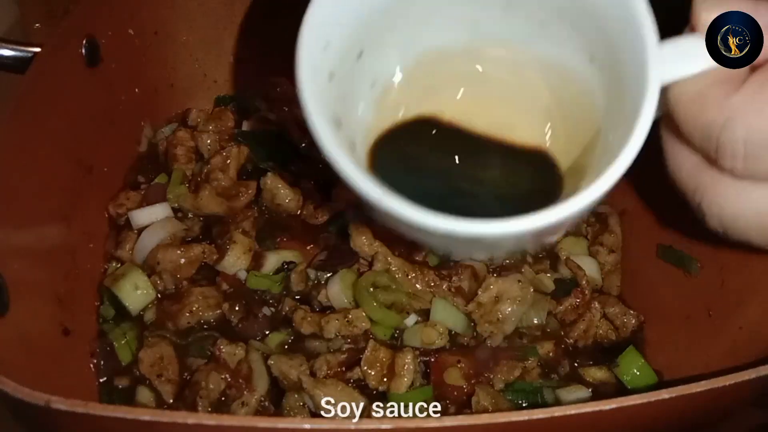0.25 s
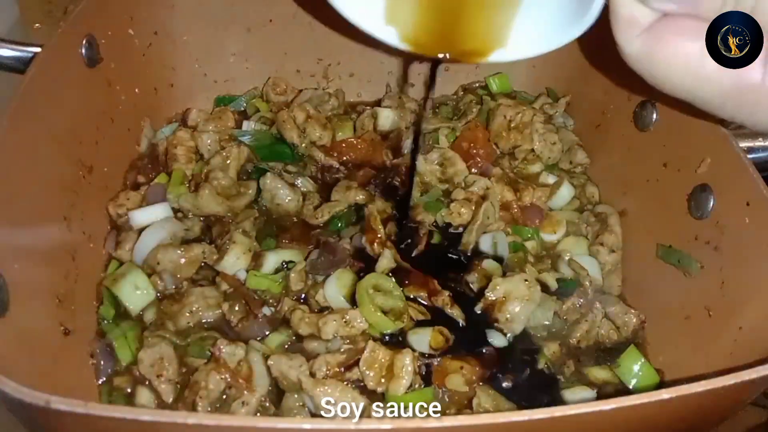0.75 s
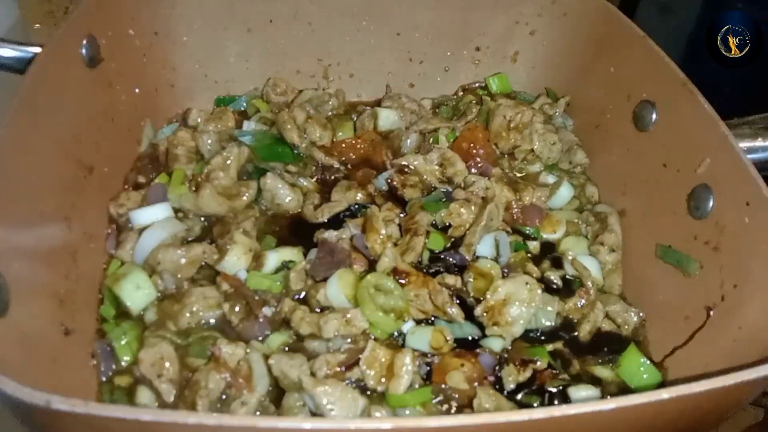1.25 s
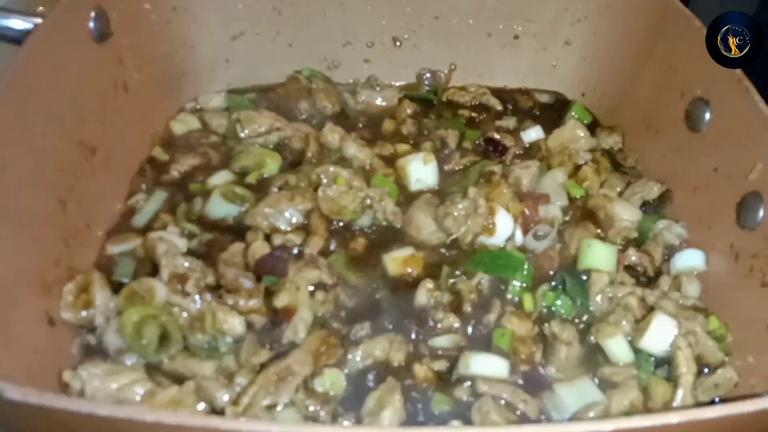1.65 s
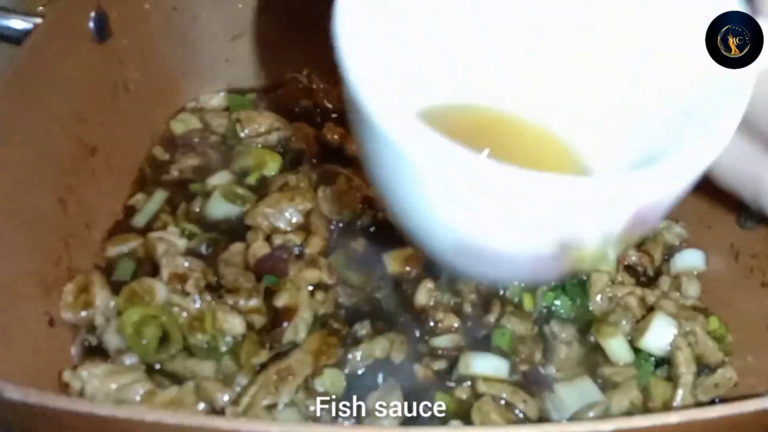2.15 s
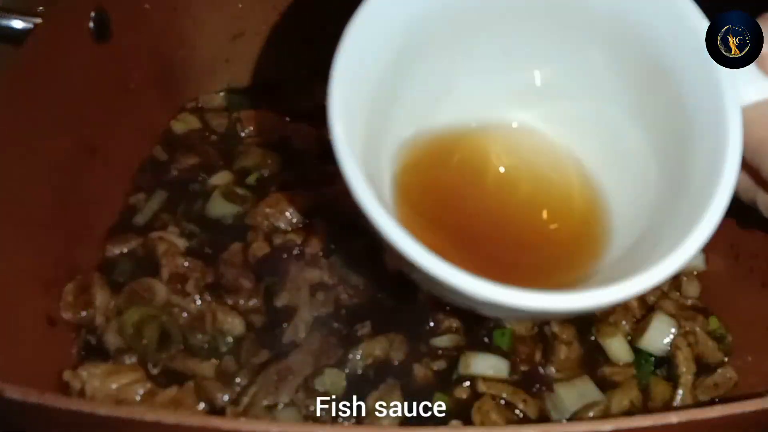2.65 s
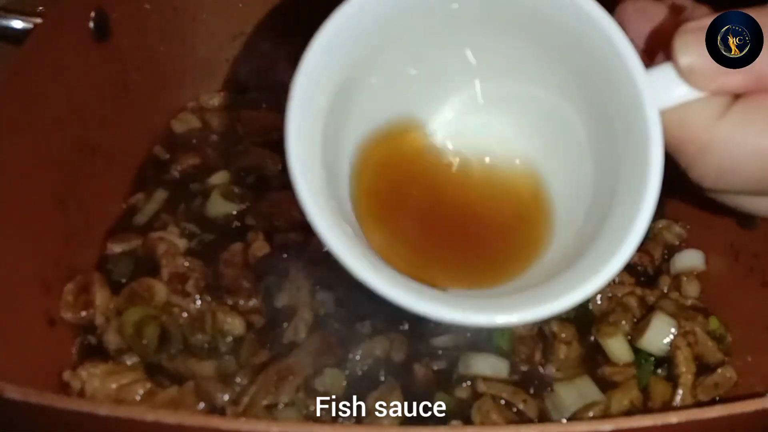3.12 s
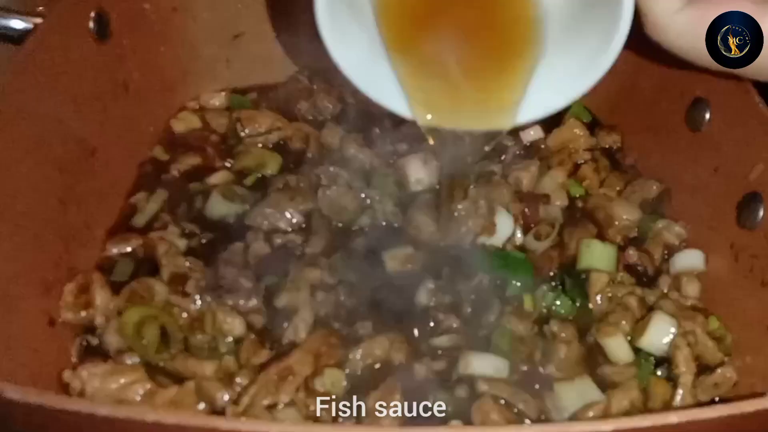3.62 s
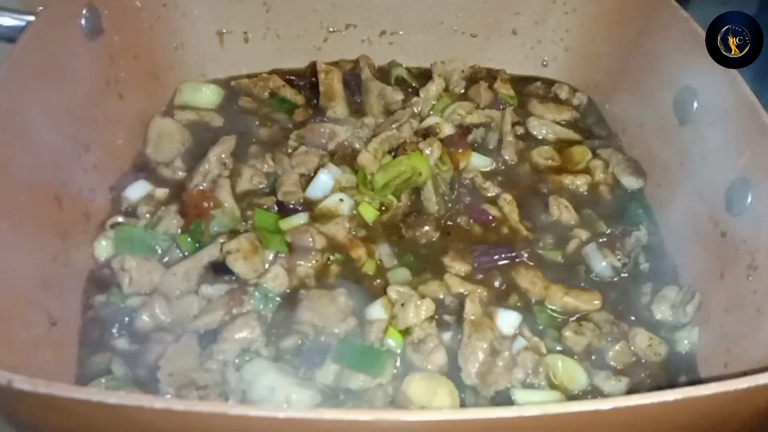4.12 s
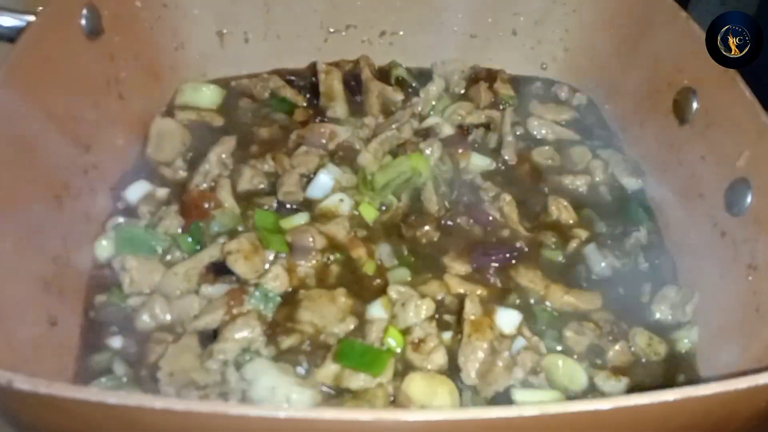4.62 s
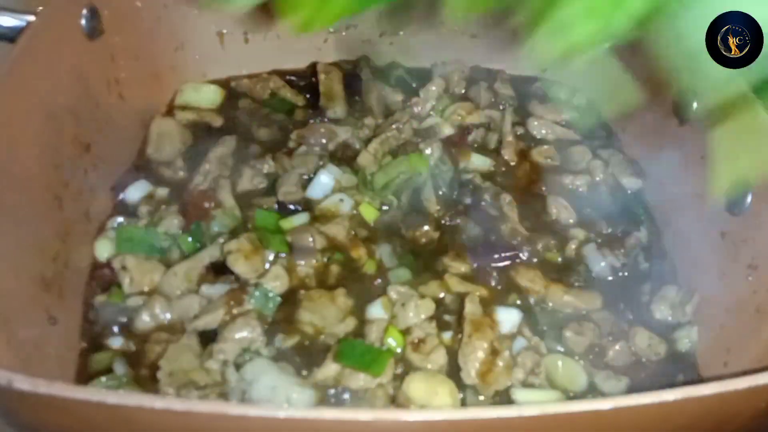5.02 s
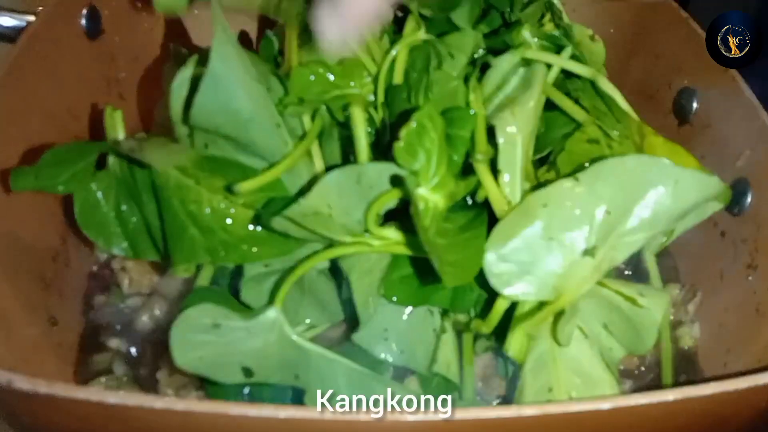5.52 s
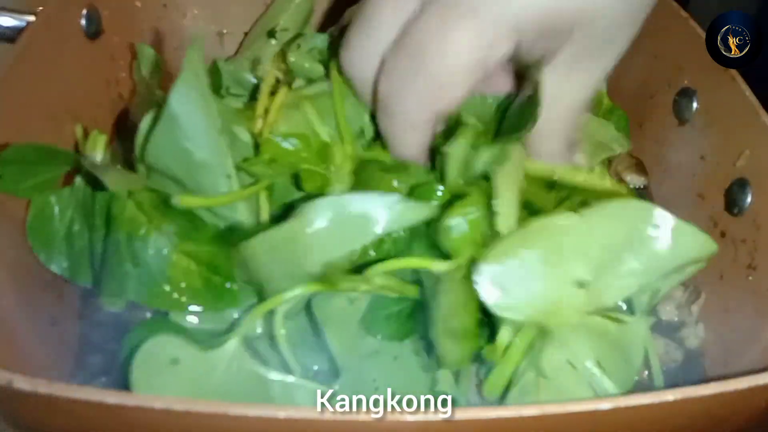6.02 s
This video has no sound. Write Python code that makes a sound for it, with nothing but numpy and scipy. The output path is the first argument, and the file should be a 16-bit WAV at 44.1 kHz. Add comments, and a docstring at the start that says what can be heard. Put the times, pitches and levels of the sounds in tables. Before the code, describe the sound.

A bright, grainy sizzle runs throughout over low bubbling sauce, a thin metallic singing from the pan and faint room rumble. Early on, a pour gurgles amid gritty steam bursts; a second one is short and faint. After a tiny dropout and a low thud, wet leaves flare the hiss and crunch softly as they are pressed down. Close, dry, mono kitchen sound.

```python
"""Meat and sauce fry in a wide pan, close to a mono microphone, over a low room rumble.
From the start, random swarms of tiny damped pings make the sizzle, and coloured noise thickens it.
The pan sings, the sauce simmers and spits, steam spurts, and poured sauce gurgles: first long, later briefly.
After about four seconds the sound drops out for an instant; later one dull knock sounds, a sagging sine.
Then a handful of wet greens lands with a brighter hiss, and rustles in short scrapes of grainy clicks."""
import sys
import numpy as np
from scipy import signal
from scipy.fft import rfft, irfft, next_fast_len
from scipy.io import wavfile
from scipy.ndimage import map_coordinates

SR = 44100
rng = np.random.default_rng(int(sys.argv[2]) if len(sys.argv) > 2 else 0)


def pcm_store(signal):
    """Save signal as 16-bit PCM."""
    levels = np.round(np.clip(np.atleast_2d(signal), -1, 1) * 32767)
    wavfile.write(sys.argv[1], SR, levels.astype(np.int16).T)


N = 276198
TIME = np.arange(N) / SR  # seconds
TOP_HZ = 15560  # nothing sounds above this


def amp(db):
    """Turn decibels into a gain."""
    return 10 ** (np.asarray(db) / 20)


def unit(x):
    """Scale x to an average (rms) strength of 1."""
    return x / np.sqrt(np.mean(x ** 2) + 1e-20)


def curves(rows):
    """Draw straight lines between table rows: one curve for each column after the time."""
    seconds, *columns = np.transpose(rows)
    return [np.interp(TIME, seconds, column) for column in columns]


def wobble(rate):
    """Make a smooth random curve through `rate` random points a second."""
    knots = rng.standard_normal(int(N * rate / SR) + 4)
    return map_coordinates(knots, [TIME * rate])


def filtered(x, response):
    """Multiply the spectrum of x by a response that depends on frequency."""
    padded = next_fast_len(N + SR // 2)
    spectrum = rfft(x, padded)
    return irfft(spectrum * response(np.fft.rfftfreq(padded, 1 / SR)), padded)[:N]


def coloured(x, points):
    """Shape the tone of x by (frequency [Hz], relative level [dB]) points, at rms 1."""
    f, db = np.transpose(points)
    return unit(filtered(x, lambda hz: amp(np.interp(np.log(hz + 1), np.log(f), db))))


def resonance(hz, centre_hz, width):
    """Response of one damped mode: a body that rings near centre_hz, `width` Hz wide."""
    return 1j * hz * width / (centre_hz ** 2 - hz ** 2 + 1j * hz * width)


def patchy(x, depth_db, width_hz, life):
    """Give x random swells, each about width_hz wide and `life` seconds long, at rms 1."""
    hz, t, z = signal.stft(x, SR, nperseg=512)
    knots = rng.standard_normal((400, 800))
    places = np.meshgrid(hz / width_hz, t / life, indexing="ij")
    field = map_coordinates(knots, places, mode="wrap")
    return unit(signal.istft(z * amp(depth_db * field), SR, nperseg=512)[1][:N])


def bubbles(rate, pitch_hz, spread, cycles, scatter_db, size):
    """A swarm of `rate` damped sines a second, random in time, pitch and strength, at rms 1."""
    count = int(rate * N / SR)
    start = rng.integers(0, N, count)[:, None]
    hz = np.clip(pitch_hz * np.exp(spread * rng.standard_normal((count, 1))), 50, TOP_HZ)
    strength = amp(scatter_db * np.minimum(rng.exponential(size=(count, 1)), 4))
    sign = rng.choice([-1, 1], (count, 1))
    turns = hz * np.arange(size) / SR
    ring = strength * sign * np.sin(2 * np.pi * turns) * np.exp(-turns / cycles)
    places = start + np.arange(size)
    return unit(np.bincount(places.ravel(), ring.ravel(), N + size)[:N])


def add(track, s, sound):
    """Mix a short sound into the track at time s."""
    start = max(round(s * SR), 0)
    track[start:start + len(sound)] += sound[:max(N - start, 0)]


def envelope(s, hold, attack, fade_db_per_s):
    """Rise from time s over `attack` seconds; fade once `hold` seconds have passed since s."""
    rise = np.clip((TIME - s) / attack, 0, 1)
    return rise * amp(-fade_db_per_s * np.maximum(TIME - s - hold, 0))


def bell(s, half):
    """A brief bell-shaped swell that peaks at time s."""
    return np.exp(-((TIME - s) / half) ** 2 / 2)


# Tone of the room rumble: (frequency [Hz], relative level [dB])
ROOM_TONE = [(20, -39), (50, -12.5), (110, -1.5), (180, 0.5), (270, -7), (330, -5), (410, -11.5),
             (900, -5.5), (4000, -35.5)]


def kitchen(level_db=-67):
    """A low, slightly uneven room rumble made of coloured noise."""
    rumble = coloured(rng.standard_normal(N), ROOM_TONE)
    rumble = patchy(rumble, depth_db=3.5, width_hz=106, life=0.052)
    return amp(level_db + 1.17 * wobble(14)) * rumble


# How hard the pan fries, before each layer's own trim; patchy_hiss and simmer read it too:
# (time [s], sizzle level [dB], patchy hiss level [dB], fine spray level [dB])
FRYING_LEVELS = [(0.0, -51, -51.5, -56), (0.1, -53.5, -57.5, -67), (0.45, -50, -55.5, -60.5),
                 (0.89, -50.5, -51.5, -58.5), (1.04, -50.5, -48.5, -51), (1.2, -49.5, -51, -58),
                 (1.5, -51, -56, -59.5), (2.05, -49.5, -53, -57.5), (2.15, -52, -56, -63),
                 (2.45, -51, -54.5, -60.5), (3.95, -51, -54, -59), (4.25, -54, -60.5, -69.5),
                 (4.58, -50.5, -57, -64), (4.87, -55, -62, -68.5), (6.26, -52, -64, -60)]
# Tone of the bursting bubbles: (frequency [Hz], relative level [dB])
SIZZLE_TONE = [(1500, -37), (2300, -27.5), (3100, -18.5), (4200, -25), (5300, -14.5), (6150, -12),
               (6450, 0), (7000, -1), (7350, -2.5), (7750, -2.5), (9000, -11), (10500, -10.5), (11200, -33),
               (16000, -40)]
# Tone of the fine spray: (frequency [Hz], relative level [dB])
SPRAY_TONE = [(4000, -51), (6000, -9), (7800, -2.5), (9000, -4.5), (10400, -3.5), (11300, -2.5), (12500, 0),
              (13050, 4), (13700, 0), (14600, 2), (15600, 4)]


def sizzle():
    """Tiny steam bubbles burst in clumps; their spray adds a finer hiss above. Wet greens feed both."""
    sizzle_db, _, spray_db = curves(FRYING_LEVELS)
    clumps = wobble(45) + 0.088 * wobble(17)

    bursts = bubbles(rate=1300, pitch_hz=6890, spread=0.32, cycles=4.1, scatter_db=3.5, size=200)
    crackle = coloured(bursts + amp(3.5) * rng.standard_normal(N), SIZZLE_TONE)
    crackle_gain = np.hypot(amp(sizzle_db), amp(-0.5) * steam(haste=1.8)) * amp(1.5 * clumps)

    droplets = bubbles(rate=2500, pitch_hz=10860, spread=0.34, cycles=2.2, scatter_db=3.0, size=64)
    spray = coloured(droplets + rng.standard_normal(N), SPRAY_TONE)
    spray = patchy(spray, depth_db=2.1, width_hz=618, life=0.042)
    pan_spray = amp(spray_db + 5.4 + 1.8 * clumps + 1.3 * wobble(13))
    greens_spray = amp(4.5 + 0.3 * clumps) * steam()
    return crackle_gain * crackle + np.hypot(pan_spray, greens_spray) * spray


# Tone of the patchy hiss: (frequency [Hz], relative level [dB])
PATCHY_HISS_TONE = [(1900, -37), (2500, -16), (2800, -13.5), (3050, -18), (3300, -11), (3800, -12.5),
                    (4100, -29.5), (4550, -16), (4950, -9.5), (5300, -1.5), (5750, 1), (6050, -4),
                    (6350, -7), (7500, -35)]


def patchy_hiss():
    """A hiss, mostly at 5 to 6 kHz, in narrow random patches that come and go; it swells with the greens."""
    pings = bubbles(rate=1500, pitch_hz=5300, spread=0.251, cycles=5.1, scatter_db=2, size=200)
    hiss = coloured(pings + amp(5.5) * rng.standard_normal(N), PATCHY_HISS_TONE)
    hiss = patchy(hiss, depth_db=5.5, width_hz=190, life=.028)
    steady_gain = amp(curves(FRYING_LEVELS)[1] + 2.5)
    return np.hypot(steady_gain, amp(-5.5) * steam(haste=1.9)) * hiss


# The pan's narrow mode sings throughout: (time [s], level [dB])
SINGING_LEVELS = [(0.0, -61), (0.9, -56.5), (1.8, -55), (2.5, -62), (3.2, -61.5), (3.85, -53),
                  (4.03, -59.5), (5.0, -60.5), (5.3, -52.5), (6.26, -53.5)]
# It also flares up at times: (time of the peak [s], level [dB])
SINGING_FLARES = [(0.265, -49.5), (0.405, -48.5), (0.608, -49), (0.89, -48.5), (1.68, -48.5), (2.29, -48),
                  (2.78, -53.5), (4.835, -53.5)]
FLARE_HALF_S = 0.016


def pan_ring():
    """Bursts on the metal keep one narrow mode singing; it swells and wavers a little in pitch."""
    taps = bubbles(rate=1200, pitch_hz=3547, spread=0.14, cycles=2.8, scatter_db=2.5, size=160)
    narrow_ring = filtered(taps, lambda hz: resonance(hz, centre_hz=3584, width=41)
                           * resonance(hz, centre_hz=3160, width=790))
    waver = np.exp(2j * np.pi * np.cumsum(30 * wobble(24)) / SR)  # shifts the pitch by some 30 Hz
    singing = (signal.hilbert(narrow_ring) * waver).real * amp(1.8 * wobble(26))
    flares = sum(amp(db) * bell(s, FLARE_HALF_S) for s, db in SINGING_FLARES)
    return np.hypot(amp(curves(SINGING_LEVELS)[0]), flares) * unit(singing)


# Tone of the simmering sauce: (frequency [Hz], relative level [dB])
SIMMER_TONE = [(250, -36), (430, -15), (540, -2), (640, -11), (740, -5), (830, -13), (950, -4.5),
               (1120, -3.5), (1300, 1), (1520, 2.5), (1800, -5.5), (2300, -7.5), (4000, -18)]


def simmer(below_sizzle_db=-8.0):
    """Slower, lower bubbles in the thick sauce; their level follows the sizzle a little."""
    swarm = bubbles(rate=1100, pitch_hz=1195.6, spread=0.3613, cycles=13.8, scatter_db=2.5, size=1400)
    body = coloured(swarm + amp(5) * rng.standard_normal(N), SIMMER_TONE)
    body = patchy(body, depth_db=1.98, width_hz=202, life=.05)
    sizzle_db = curves(FRYING_LEVELS)[0]
    average_db = sizzle_db.mean()
    return amp(average_db + below_sizzle_db + 0.28 * (sizzle_db - average_db)) * body


# Blubs in the sauce, and one short high chirp near the pan's singing pitch:
# (time [s], level before the soft swell [dB], starting pitch [Hz])
BLUBS_AND_CHIRP = [(0.235, -45, 1260), (0.378, -37.5, 1390), (0.545, -45, 1100), (0.618, -48.5, 243),
                   (0.750, -41, 1250), (1.036, -40.5, 734), (1.149, -39, 1567), (1.313, -37.5, 1440),
                   (1.325, -53, 380), (1.343, -52, 121), (1.583, -43, 1740), (1.606, -41.5, 947),
                   (1.67, -44, 702), (2.491, -45, 1210), (2.722, -47.5, 1252), (3.745, -46.5, 743),
                   (4.415, -30, 3710), (5.545, -44, 521), (6.02, -49.5, 343)]
# Ring time (to -60 dB) of the lowest blubs, random spread of the pitch, pitch above which they die fast
BLUB_T60_S, BLUB_WIDTH_HZ, BLUB_SMALL_HZ = 0.14, 20, 2590


def blubs_and_chirp():
    """Blubs swell softly and rise in pitch, as does one high chirp; the higher the pitch, the sooner it dies."""
    out, t = np.zeros(N), np.arange(SR // 5) / SR
    for s, db, hz in BLUBS_AND_CHIRP:
        t60 = BLUB_T60_S / (1 + (hz / BLUB_SMALL_HZ) ** 2)
        swell = (1 - np.exp(-t / .006)) * amp(db - 60 * t / t60)
        quiver = np.cumsum(rng.standard_normal(len(t))) * np.sqrt(2 * np.pi * BLUB_WIDTH_HZ / SR)
        rising_phase = 2 * np.pi * hz * t * (1 + 0.043 * t / t60)
        add(out, s, swell * np.sin(rising_phase + quiver))
    return out


# Liquid flashing to steam on hot metal:
# (time of the peak [s], level [dB], half length [s], lowest pitch [Hz])
STEAM_SPURTS = [(0.385, -37.5, 0.0088, 3600), (0.788, -45, 0.014, 2490), (1.057, -43.5, 0.0098, 3200),
                (1.085, -43.5, 0.0071, 4200), (1.151, -35, 0.0078, 1750), (2.914, -52.5, 0.0077, 2730),
                (3.383, -42, 0.0023, 6100), (3.857, -54.5, 0.028, 1800), (4.6, -56, 0.015, 10000),
                (4.716, -48, 0.016, 9000), (5.403, -42, 0.034, 4300), (5.491, -36, 0.0014, 6500),
                (5.9112, -35.5, .0011, 6550), (5.916, -38, 0.00078, 6200), (5.998, -44, 0.036, 5150)]
# Tone of the steam puffs: (frequency [Hz], relative level [dB])
PUFF_TONE = [(1500, 3), (2600, -1), (3500, 1), (4250, -4.5), (5400, 3), (7000, -0.5), (15000, 1)]


def spurts(tilt=0.4):
    """Short, gritty puffs of steam, each with its own low edge and a gentle loss of treble above it."""
    out = np.zeros(N)
    grit = bubbles(rate=3500, pitch_hz=4900, spread=.42, cycles=3, scatter_db=2.6, size=200)
    grit = patchy(coloured(grit, PUFF_TONE), depth_db=2.5, width_hz=230, life=.03)
    grit = grit * amp(1.4 * wobble(260))
    for s, db, half, low_hz in STEAM_SPURTS:
        shape = bell(s, half)
        puff = shape * filtered(
            grit, lambda hz: (1 - 1 / (1 + (hz / low_hz) ** 6)) / (1 + hz / low_hz) ** tilt)
        # even out the strength, so that the table alone sets the level
        out += amp(db) * puff * np.linalg.norm(shape) / np.linalg.norm(puff)
    return out


# The loudest snapping bubbles: (time [s], peak level before a 5 dB cut [dB], pitch [Hz])
SNAPPING_BUBBLES = [(0.5453, -27, 5740), (0.771, -23, 7380), (1.0854, -29, 5430), (1.3197, -25, 5230),
                    (1.909, -25, 5790), (2.352, -27, 5350), (3.3812, -24, 6000), (4.0077, -30, 5950),
                    (4.079, -27, 7100), (4.1807, -32, 6960), (4.2514, -25.5, 6720), (4.399, -26, 14400),
                    (4.455, -21, 6700), (4.653, -30.5, 7680), (4.952, -28.5, 7300), (5.4005, -20.5, 6170),
                    (5.965, -26, 6100), (5.973, -24, 5970)]


def pops():
    """A snapping bubble: a brief sine ping with a crack of fine spray made of bright noise."""
    out, t = np.zeros(N), np.arange(SR // 60) / SR
    for s, db, hz in SNAPPING_BUBBLES:
        ping = np.sin(2 * np.pi * hz * t) * amp(-60 * t / 0.0076)
        crack = 0.13 * np.diff(rng.standard_normal(len(t) + 1)) * amp(-60 * t / 0.013)
        snap = (ping + crack) * (1 - np.exp(-t / 0.0002))
        add(out, s, amp(db - 5.0) * snap / np.abs(snap).max())
    return out


# Sauce poured from a cup: (time [s], length [s], level [dB])
SAUCE_POURS = [(0.68, 1.05, -58.5), (3.72, 0.2, -64)]
POUR_ATTACK_S, POUR_FADE_DB_PER_S = 0.1, 50


def trickle(centre_hz=1450, width=260, spatter_db=-7.5):
    """Poured sauce gurgles in bubbles of nearly one size, and spatters in drops of all sizes."""
    swarm = bubbles(rate=500, pitch_hz=1470, spread=.1, cycles=8, scatter_db=2.5, size=1000)
    gurgle = unit(filtered(swarm, lambda hz: resonance(hz, centre_hz, width)))
    drops = bubbles(rate=220, pitch_hz=1800, spread=.55, cycles=12, scatter_db=2.5, size=1400)
    stream = sum(amp(db) * envelope(s, length, POUR_ATTACK_S, POUR_FADE_DB_PER_S)
                 for s, length, db in SAUCE_POURS)
    return stream * (gurgle + amp(spatter_db) * drops)


def knock(s=4.7262, thud_db=-15, start_hz=270, rest_hz=110, tick_hz=1870, tick_db=-28,
          crack_db=-32, boom_db=-42, body_hz=395, body_db=-42):
    """A damped thud whose pitch sags, with a hard tick in its first milliseconds, a hollow ring and a room boom."""
    out, t = np.zeros(N), np.arange(SR // 4) / SR
    hz = rest_hz + (start_hz - rest_hz) * np.exp(-t / 0.0028)
    thud_shape = (1 - np.exp(-t / 0.0015)) * np.exp(-(t / 0.013) ** 2)
    thud = np.sin(2 * np.pi * np.cumsum(hz) / SR) * thud_shape
    thud = signal.sosfilt(signal.butter(3, 750, fs=SR, output="sos"), thud)

    contact = np.exp(-((t - .0021) / .0013) ** 2)  # the brief moment of touch
    crack_tone = [(2500, -8.0), (4500, -18), (5500, 2), (9000, -9), (15000, -18)]
    crack = coloured(rng.standard_normal(N), crack_tone)[:len(t)]
    tick = amp(tick_db) * np.sin(2 * np.pi * tick_hz * t) + amp(crack_db) * crack

    boom_tone = [(25, -10), (70, 1), (200, -11), (390, -5), (560, -17), (4000, -68.5)]
    boom = coloured(rng.standard_normal(N), boom_tone)[:len(t)]
    boom = amp(boom_db - 60 * t / 0.17) * boom
    body = np.sin(2 * np.pi * body_hz * t) * amp(body_db - 60 * t / 0.13)
    add(out, s, amp(thud_db) * thud + body + contact * tick + boom)
    return out


# Wet greens touch the hot pan and steam, before each layer's own trim and haste:
# (time [s], hold [s], level [dB], fade [dB per s])
GREENS_STEAMING = [(4.975, 0.52, -48, 16.5), (5.892, 0.072, -55, 70)]
STEAM_ATTACK_S = 0.057


def steam(haste=1):
    """Strength of the steam off the wet greens; haste makes it die sooner."""
    return sum(amp(db) * envelope(s, hold, STEAM_ATTACK_S, haste * fade)
               for s, hold, db, fade in GREENS_STEAMING)


# Greens settle and are pressed down: (time [s], length [s], rustle level [dB])
GREENS_RUBS = [(5.298, 0.11, -54.5), (5.384, 0.082, -52), (5.518, 0.077, -51), (5.714, 0.04, -54),
               (5.85, 0.14, -57.5), (5.968, 0.045, -48)]
RUB_ATTACK_S, RUB_FADE_DB_PER_S = 0.013, 110
# The hollow of the pan, one mode a row: (frequency [Hz], width [Hz], relative level [dB])
PAN_HOLLOW = [(534, 24, -6), (730, 23, -11), (986, 19, 1), (1130, 35, -30), (1520, 52, 2.5), (1933, 64, 8),
              (2165, 60, 0), (2580, 51, 1)]
# Tone of the rustle: (frequency [Hz], relative level [dB])
RUSTLE_TONE = [(150, -34), (330, 3), (420, -8), (520, -1), (1000, 4), (2000, 0.5), (2600, 7.5), (4200, 4),
               (6000, -10), (10000, -40)]


def greens():
    """Leaves and stalks rub and crunch in short scrapes inside the hollow of the pan."""
    rubs = bubbles(rate=2200, pitch_hz=1667, spread=0.99, cycles=1.86, scatter_db=4.0, size=240)
    rubs = unit(rubs * amp(1.8 * wobble(70)))
    hollow = filtered(rubs, lambda hz: sum(
        amp(db) * resonance(hz, centre, width) for centre, width, db in PAN_HOLLOW))
    scrapes = coloured(unit(hollow) + amp(-5.5) * rubs, RUSTLE_TONE)
    scrapes = patchy(scrapes, depth_db=3.6, width_hz=220, life=.045)
    # where strokes overlap, the strongest one counts
    strokes = np.max([amp(db) * envelope(s, length, RUB_ATTACK_S, RUB_FADE_DB_PER_S)
                      for s, length, db in GREENS_RUBS], axis=0)
    return strokes * scrapes


def scene():
    """Everything reaches one microphone, alike in both channels."""
    frying = sizzle() + patchy_hiss() + pan_ring() + simmer() + blubs_and_chirp() + spurts() + pops()
    mono = kitchen() + frying + trickle() + knock() + greens()
    return np.array([mono, mono])


def record(dry):
    """The sound drops out for an instant, and nothing passes above the band limit."""
    # silent for 4 ms either side of the middle, with 2 ms ramps
    gate = np.clip((np.abs(TIME - 4.0725) - .004) / .002, 0, 1)
    return np.array([filtered(channel * gate, lambda hz: hz < TOP_HZ) for channel in dry])


dry = scene()
out = record(dry)
pcm_store(out)
```